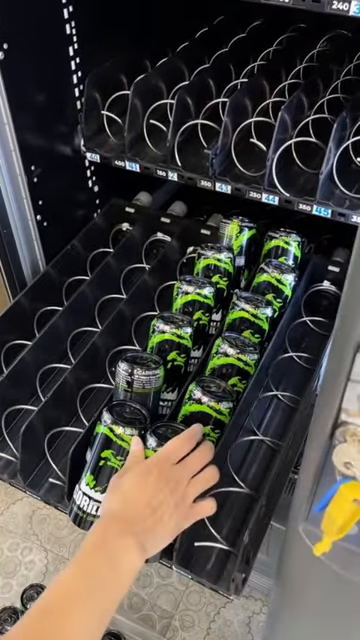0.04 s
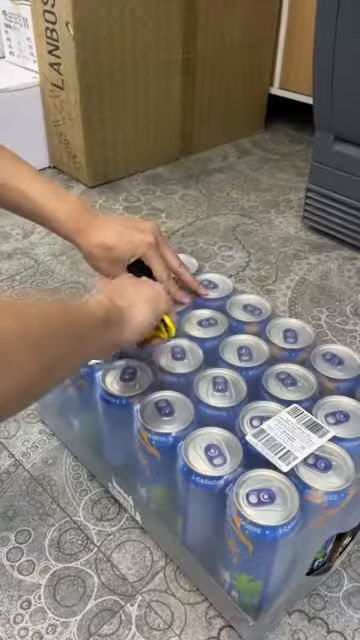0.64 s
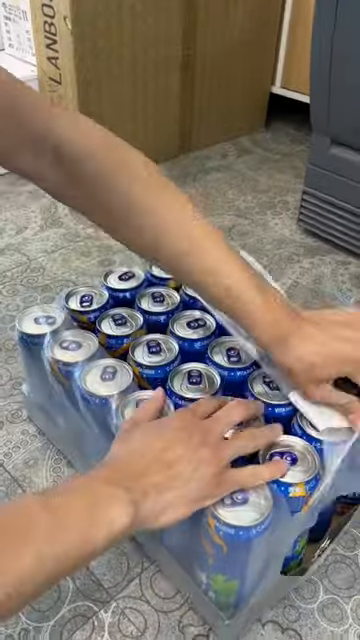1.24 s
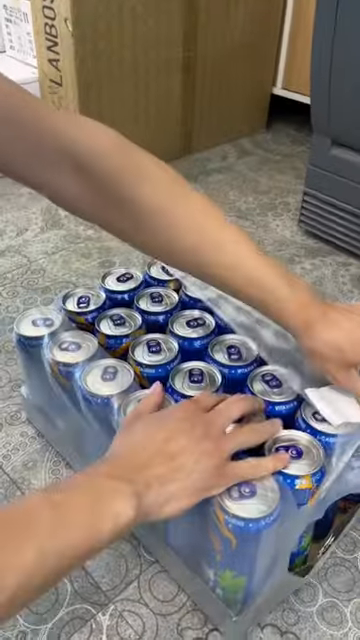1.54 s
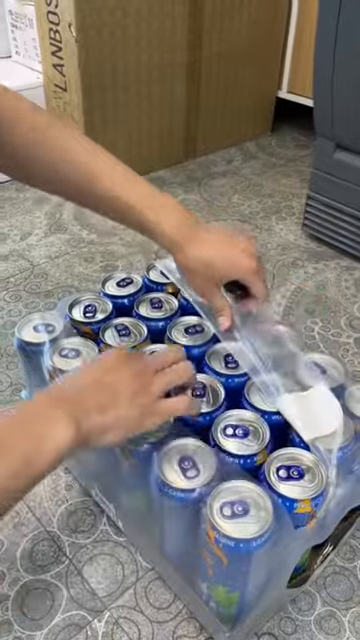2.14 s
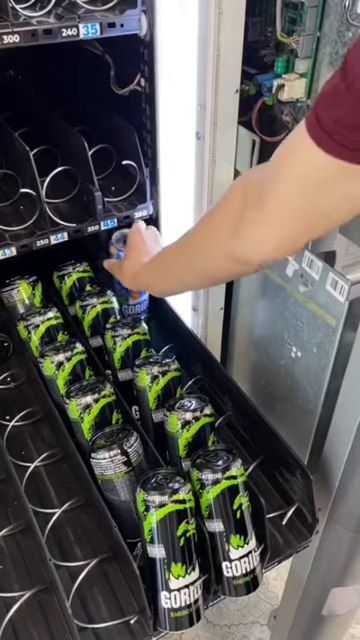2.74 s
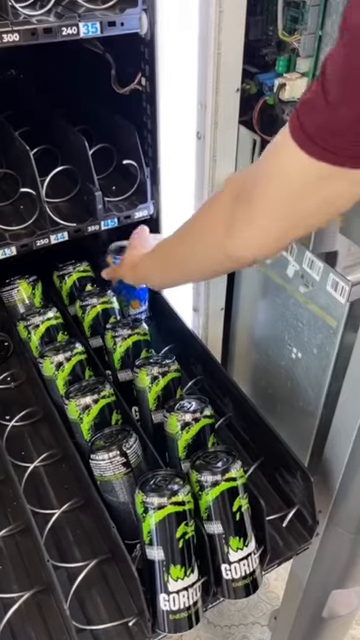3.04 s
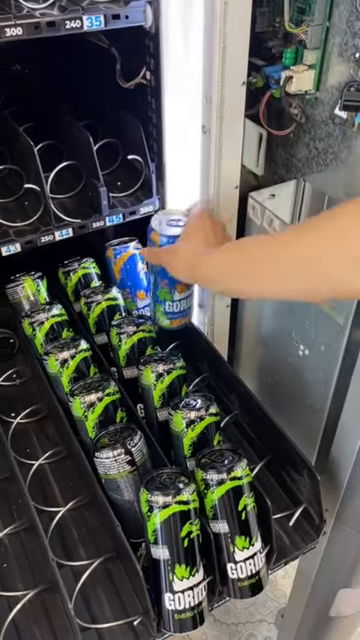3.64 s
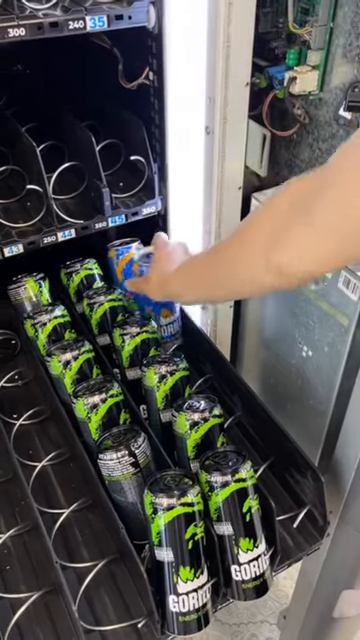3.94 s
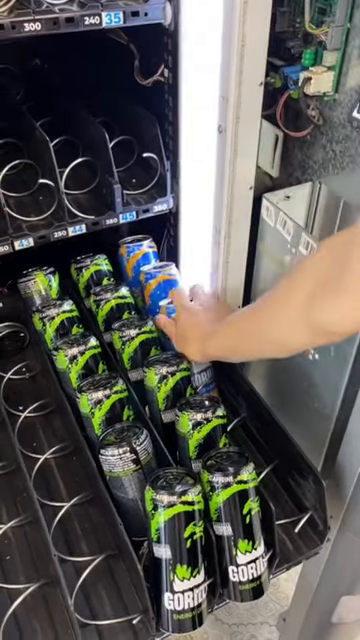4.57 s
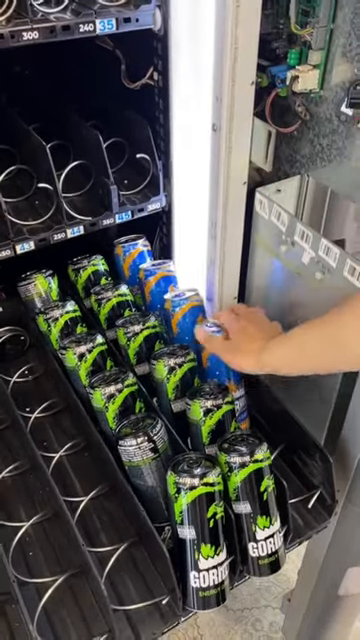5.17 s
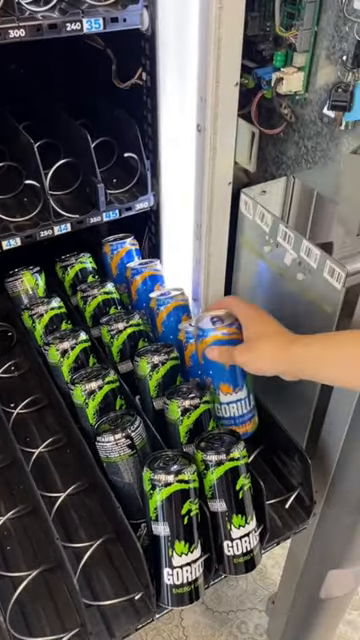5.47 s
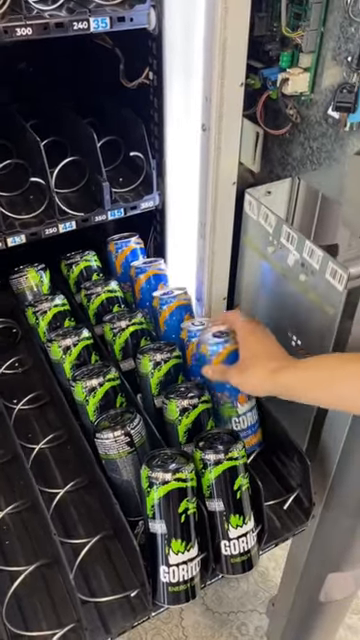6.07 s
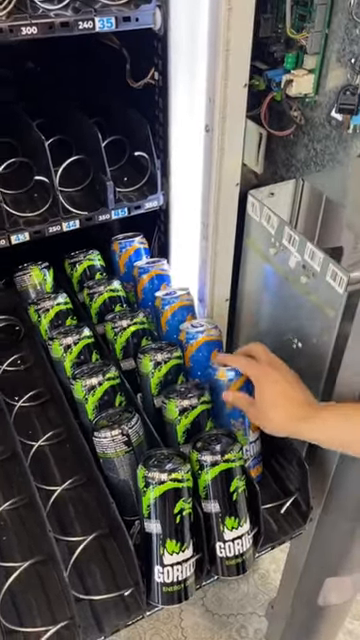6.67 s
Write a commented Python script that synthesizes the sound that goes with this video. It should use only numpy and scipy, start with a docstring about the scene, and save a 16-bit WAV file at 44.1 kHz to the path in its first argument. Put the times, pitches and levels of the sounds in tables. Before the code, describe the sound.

Plastic film snaps and tears off a pack, followed by full cans clunking and scraping into a vending machine's steel tray.

```python
"""Unwrapping and loading drink cans

Close to the microphone, a knife slits the shrink wrap on a pack of cans, tapping their lids, and the
film crinkles and snaps as it is torn back. Full cans are then set one by one into the sheet-metal tray
of a vending machine. Impact and friction excite the modes of cans, tray and wire spiral as they knock,
rock and slide. Soft bumps thud on the microphone, and the loudest blows overload it."""
import sys
import numpy as np
from scipy import signal
from scipy.fft import rfft, irfft, next_fast_len
from scipy.io import wavfile
from scipy.ndimage import uniform_filter1d

SR = 44100
rng = np.random.default_rng(int(sys.argv[2]) if len(sys.argv) > 2 else 0)


def digitize_waveform(pressure):
    """Quantize a signal to 16-bit integers and store it at the path in sys.argv[1].

    Rows of a 2-D input are taken as channels; values are limited to [-1, 1].
    """
    field = np.atleast_2d(pressure).T
    bounded = np.clip(field, -1, 1)
    quanta = np.round(bounded * 32767).astype(np.int16)
    wavfile.write(sys.argv[1], SR, quanta)


N = 300321
RING_SIZE, LEAD_SIZE = 22000, 400   # samples: one response, and the lead-in to a contact
TIME = np.arange(N) / SR
AGE = TIME[:RING_SIZE]


def from_db(db):
    """Amplitude ratio: 20 dB is a factor of ten."""
    return 10 ** (np.asarray(db) / 20)


def rms_one(x):
    """Normalisation to unit mean power."""
    return x / np.sqrt(np.mean(x ** 2) + 1e-20)


def dying(t60):
    """Exponential damping: 60 dB in t60 seconds."""
    return np.exp(-np.log(1000) * AGE / max(t60, 1e-3))


# moments at which ringing stops short: time_s
STOPS_S = [3.984, 5.15, 6.73]

def add(out, start_s, sound):
    """Superposition: mix in a sound, cut off at the next stop."""
    start = max(int(start_s * SR), 0)
    stop = min([start + len(sound), N] + [int(s * SR) for s in STOPS_S if s > start_s])
    out[start:stop] += sound[:stop - start]


def colour(x, spectrum):
    """Minimum-phase filtering: folding the cepstrum makes the given spectrum causal."""
    size = 2 * next_fast_len(len(x) // 2 + RING_SIZE)
    hz, db = np.transpose(spectrum)
    bins = np.maximum(np.arange(size // 2 + 1) * SR / size, 1)
    gain = from_db(np.interp(np.log(bins), np.log(hz), db))
    cepstrum = irfft(np.log(gain))
    cepstrum[1:size // 2] *= 2
    cepstrum[size // 2 + 1:] = 0
    return irfft(rfft(x, size) * np.exp(rfft(cepstrum)))[:len(x)]


def grains(per_s, spread_db, size=N):
    """Shot noise: tiny random contacts, most weak, a few strong."""
    strength = from_db(spread_db * np.minimum(rng.exponential(1, size), 4))
    return (rng.random(size) < per_s / SR) * strength * rng.choice([-1, 1], size)


def flicker(per_s, depth_db):
    """Random amplitude modulation: a wandering gain."""
    knots = rng.standard_normal(2048)
    return from_db(depth_db * np.interp(TIME * per_s, np.arange(len(knots)), knots))


def effort(moves, attack_s, t60):
    """Power summation of moves (start_s, length_s, level_db) that each rise, hold and decay."""
    power, age = np.zeros(N), TIME[:SR]
    attack = np.minimum(age / attack_s, 1)
    for start_s, length_s, db in moves:
        release_db = -60 * np.maximum(age - length_s, 0) / t60
        add(power, start_s, (attack * from_db(db + release_db)) ** 2)
    return np.sqrt(power)


def ringing(modes, detune):
    """Modal decay: where a body is hit and how it is held vary each mode's strength and pitch."""
    strengths = rng.choice([-1, 1], len(modes)) * from_db(2 * rng.standard_normal(len(modes)))
    shifts = 1 + detune * rng.standard_normal(len(modes))
    return sum(strength * from_db(db) * np.sin(2 * np.pi * hz * shift * AGE) * dying(t60)
               for strength, shift, (hz, db, t60) in zip(strengths, shifts, modes))


def cloud(dense_t60, room_db, room_t60, dull_hz):
    """Modal overlap: dense modes merge into decaying noise, with a duller room tail behind."""
    near, far = rng.standard_normal((2, RING_SIZE))
    far = signal.sosfilt(signal.butter(1, dull_hz, fs=SR, output="sos"), far)
    return near * dying(dense_t60) + from_db(room_db) * far * dying(room_t60)


def strike(blows, edges_hz, registers, body, note_db, note_q, chatter_db, rise_s, window_size):
    """Impact as convolution: a force that builds, hits and chatters drives a body's impulse response."""
    out = np.zeros(N)
    bands = [signal.butter(3, pair, "band", fs=SR, output="sos") for pair in zip(edges_hz, edges_hz[1:])]
    since = AGE - AGE[LEAD_SIZE]
    for start_s, length_s, level_db, pitch_hz, *character in blows:
        build_up = np.minimum(since, 0) / rise_s
        fall = (np.maximum(since, 0) / max(length_s, 1e-3)) ** 2
        chatter = grains(per_s=6000, spread_db=2.2, size=RING_SIZE) * np.exp(build_up - fall)
        force = from_db(chatter_db) * rms_one(chatter) / np.sqrt(RING_SIZE)
        force[LEAD_SIZE] += 1   # the main contact
        sound = signal.fftconvolve(force, body())[:RING_SIZE]
        sound += from_db(note_db) * signal.lfilter(*signal.iirpeak(pitch_hz, note_q, fs=SR), sound)
        band_levels_db = level_db + np.dot(registers, [1, *character])
        for band, db in zip(bands, band_levels_db):
            part = signal.sosfilt(band, sound)
            peak_rms = np.sqrt(uniform_filter1d(part ** 2, window_size).max())
            add(out, start_s + since[0] + rise_s, from_db(db) * part / peak_rms)
    return out


# spectrum of the quiet room: frequency_hz, gain_db
ROOM_SPECTRUM = [(25, 5), (100, -17), (230, -5), (450, -2.5), (600, -10.5), (780, -2), (1000, -9.5),
                 (1350, -15), (2000, -29), (8000, -35.5)]

def room_tone():
    """Stationary noise: a faint, low background."""
    return from_db(-59) * rms_one(colour(rng.standard_normal(N), ROOM_SPECTRUM))


# spectrum of the microphone's rumble: frequency_hz, gain_db
RUMBLE_SPECTRUM = [(15, -8.5), (30, 1), (60, -13), (120, -6.5), (200, -19.5), (400, -38)]
# soft bumps on the microphone: start_s, peak_db, pitch_hz, swell_s
BUMPS = [(0.005, -29.5, 58.5, .02), (0.56, 1, 47.35, 0.014), (0.606, -11, 52, .012),
         (0.701, -11.5, 56, 0.013), (0.897, -22, 60, 0.01), (0.956, -15.5, 65, 0.0052),
         (1.167, -5, 50, 0.0093), (1.203, -2, 110, 0.0054), (1.29, 1, 55, 0.0057), (1.363, -5.5, 50, 0.016),
         (1.404, -0.5, 46, 0.0061), (1.521, -9, 72, 0.0082), (1.611, -11, 87.7, 0.003),
         (1.674, -12.5, 49.8, 0.014)]

def handling():
    """Handling noise: bumps swing the air briefly; they and heavy knocks swell a faint, steady rumble."""
    jolts = [(s, swell_s, db - 23) for s, db, _, swell_s in BUMPS]
    jolts += [(s, length_s, db + weight_db - 39.5) for s, length_s, db, _, weight_db, _ in KNOCKS]
    rumble_gain = from_db(-63) + effort(jolts, attack_s=0.015, t60=0.9)
    out = rumble_gain * rms_one(colour(rng.standard_normal(N), RUMBLE_SPECTRUM))
    for start_s, db, hz, swell_s in BUMPS:
        age = AGE / swell_s
        swell = from_db(db) * age ** 2 * np.exp(2 - 2 * age)
        add(out, start_s, swell * np.sin(2 * np.pi * (hz * AGE + rng.random())))
    return out


# modes of the stretched film: frequency_hz, level_db, t60_s
FILM_MODES = [(353, -16, 0.06), (1096, -18, 0.05), (2250, -16, 0.048), (3590, -6, .03)]

def film_response():
    """Heavy damping: taut film gives a crack and hardly rings."""
    crack = cloud(dense_t60=0.0097, room_db=-17.5, room_t60=0.098, dull_hz=9050)
    return crack + from_db(-30.5) * ringing(FILM_MODES, detune=0.057)


# spectra of film crinkling, rubbing and flapping: frequency_hz, gain_db
CRINKLE_SPECTRUM = [(1800, -26), (2800, -1), (4000, -0.5), (5300, 4.5), (6600, 3), (8200, -0.5),
                    (9500, 0.5), (11000, -20)]
RUB_SPECTRUM = [(450, -32.5), (800, 7.5), (1100, 3.5), (1400, 4), (1900, 5.5), (2800, 5), (4000, -28)]
FLAP_SPECTRUM = [(80, -15.5), (180, -1), (330, -1.5), (480, -2.5), (700, -13.5), (1500, -42)]
# pulls on the film: start_s, length_s, level_db, slackness_db
PULLS = [(0.12, 0.045, -45, -10), (0.247, 0.12, -26, -2), (0.47, 0.11, -28.5, -15),
         (0.61, 0.46, -35.5, -9.5), (0.91, 0.079, -36, -1.5), (1.024, 0.11, -41, -2.5),
         (1.13, 0.21, -30, -1.5), (1.496, 0.069, -27.5, -0.5), (1.572, 0.1, -13.5, -11.5),
         (1.691, 0.18, -22.5, -15), (1.874, 0.18, -24.5, 3.5), (2.115, 0.17, -52.5, 20.5),
         (2.266, 0.04, -27.5, -7.5), (2.424, .115, -38, -9)]

def film_pulls():
    """Buckling: creases flip as the film is pulled; taut film crinkles, slack film also rubs and flaps."""
    def pull(slack_share):
        moves = [(s, length_s, db + slack_share * slack_db) for s, length_s, db, slack_db in PULLS]
        return effort(moves, attack_s=0.016, t60=0.18)

    fine = rms_one(grains(per_s=4200, spread_db=3.9) * flicker(per_s=110, depth_db=1.6))
    hiss = 1.1 * rng.standard_normal(N)   # crinkle smeared by the room
    folds = rms_one(signal.fftconvolve(grains(per_s=130, spread_db=2.8), film_response())[:N])
    creases = (fine + hiss + from_db(1) * folds) * flicker(per_s=45, depth_db=1.5)
    flutter = grains(per_s=1500, spread_db=2.7)
    crinkle = from_db(-0.5) * pull(slack_share=0) * rms_one(colour(creases, CRINKLE_SPECTRUM))
    rub = from_db(-4) * pull(slack_share=0.4) * rms_one(colour(creases, RUB_SPECTRUM))
    flap = from_db(1) * pull(slack_share=1) * rms_one(colour(flutter, FLAP_SPECTRUM))
    return crinkle + rub + flap


# limits of the film's bands (body, middle, crack, fizz): edge_hz
FILM_EDGES_HZ = [120, 800, 2500, 6000, 11000]
# the same bands, where brightness trades body for fizz: offset_db, brightness_share
FILM_REGISTERS = [(-2.5, -1.1), (-3.5, -0.43), (0.5, .4), (-1.5, 0.72)]
# film splitting and snapping: start_s, length_s, level_db, pitch_hz, brightness_db
SNAPS = [(0.259, 0.0076, -8.5, 680, -1), (0.311, 0.044, -21.5, 600, 1.5), (0.366, .003, -14.5, 5750, 4.5),
         (0.419, 0.012, -11, 7600, 7), (0.4695, 0.0039, -17, 3700, 12), (0.486, 0.0062, -9.5, 3500, 7),
         (1.142, 0.0022, -23.5, 2900, 5.5), (1.159, 0.0021, -21.5, 2900, 15.5),
         (1.167, 0.008, -13, 2850, 2.5), (1.19, 0.0067, -11.5, 3000, 4), (1.256, .002, -24.5, 3020, 0),
         (1.298, 0.004, -22.5, 600, -11), (1.365, 0.0015, -28, 3000, -6.5), (1.384, .006, -17.5, 930, -7),
         (1.408, 0.0023, -22.5, 3000, -4.5), (1.4755, 0.0031, -18, 2400, -2),
         (1.563, 0.0027, -18, 1800, -2), (1.603, .003, -13, 4850, 1), (1.684, 0.0071, -16.5, 3750, 2.5),
         (1.844, 0.0061, -11, 2750, 4), (1.865, 0.0013, -13.5, 2750, 1), (1.887, 0.0024, -19, 2250, 4.5),
         (1.914, 0.0013, -13.5, 8300, -3), (1.984, 0.0039, -17, 600, 0.5), (2.031, 0.0028, -22, 7800, 17),
         (2.047, 0.0039, -22.5, 330, -9), (2.07, .002, -12.5, 2160, -5.5), (2.083, 0.0032, -19, 313, -4),
         (2.117, 0.0045, -17.5, 5700, 1), (2.262, 0.02, -27.5, 350, -7.5), (2.354, 0.0009, -34, 2050, -7.5),
         (2.431, 0.001, -31.5, 1800, 3.5), (2.49, 0.0044, -28, 1000, -7)]

def film_snaps():
    """Sudden release of tension: each split sends an impulse through the film."""
    return from_db(1) * strike(SNAPS, FILM_EDGES_HZ, FILM_REGISTERS, film_response,
                               note_db=2.1, note_q=7, chatter_db=1, rise_s=0.0016, window_size=220)


# modes of a can lid: frequency_hz, level_db, t60_s
LID_MODES = [(1017, -1, 0.1), (1650, -10, 0.17), (1852, -7, 0.091), (1879, -4, .07), (2420, -12, .12),
             (2654, -20.5, .13), (2920, -16, 0.057)]
# the blade tapping lids through the film: start_s, length_s, level_db, pitch_hz, brightness_db
KNIFE_TAPS = [(0.585, .0024, -17.5, 3900, 1), (0.632, 0.0022, -23.5, 2600, 3),
              (0.773, 0.0061, -17, 1060, 3), (0.791, 0.0043, -17.5, 5000, 13.5),
              (0.878, 0.00094, -13.5, 4080, 9.5), (0.894, .008, -11, 1890, 8.5),
              (0.916, .006, -24.5, 5600, 14.5), (0.99, .006, -10, 1960, 4.5)]

def knife():
    """Impulse excitation: each tap of the blade cracks the film and leaves a lid ringing."""
    out = strike(KNIFE_TAPS, FILM_EDGES_HZ, FILM_REGISTERS, film_response,
                 note_db=2.1, note_q=7, chatter_db=15, rise_s=0.0012, window_size=220)
    for start_s, _, db, *_ in KNIFE_TAPS:
        add(out, start_s, from_db(db - 2.5) * ringing(LID_MODES, detune=0.0024))
    return out


# modes of the wire spiral: frequency_hz, level_db, t60_s
SPIRAL_MODES = [(727, -4, 2.6), (833, 1.5, 0.8), (1385, -10.5, 0.57)]

def spiral():
    """Light damping: the wire spiral sings on faintly after every knock."""
    out = np.zeros(N)
    for start_s, _, db, *_ in KNOCKS:
        add(out, start_s, from_db(db - 33.5) * ringing(SPIRAL_MODES, detune=0.012))
    return out


# modes of the loaded tray: frequency_hz, level_db, t60_s
TRAY_MODES = [(78.2, -7, 0.29), (109, -17.5, 0.28), (148.8, -7, 0.21), (169.2, -4.5, 0.26),
              (310, -18.5, 0.084), (358.3, -3.5, 0.1), (443.2, 4, 0.18), (462, 2.5, 0.19),
              (519.7, 5.5, 0.067), (602.7, -3.5, 0.12), (676.7, 2, 0.069), (702.4, -0.5, 0.22),
              (756, -18.5, 0.11), (760, -20, 0.035), (962, -3, 0.15), (1092, -9, 0.27), (1093, -15.5, 0.39),
              (1452, -18.5, 0.36), (1830, 0.5, 0.17), (1944, -8.5, 0.18)]
# spectral envelope of the tray's response: frequency_hz, gain_db
TRAY_SPECTRUM = [(160, 2), (225, -6), (300, 5), (700, -3), (800, -1.5), (1050, -3), (1450, 0), (3300, -1.5),
                 (3850, -6), (4600, -1.5), (6200, 3), (6650, -1), (9000, -3)]

def tray_response():
    """Impulse response: full cans and the steel tray ring together inside the cabinet."""
    dense = cloud(dense_t60=0.096, room_db=-17.5, room_t60=0.41, dull_hz=3000)
    return colour(dense + from_db(-23.5) * ringing(TRAY_MODES, detune=0.0091), TRAY_SPECTRUM)


# spectra of the tray's drone and the cans' scratch: frequency_hz, gain_db
DRONE_SPECTRUM = [(130, -10.5), (345, -1.5), (470, -9.5), (720, -0.5), (1000, -8.5), (1600, -21.5),
                  (3000, -61)]
SCRATCH_SPECTRUM = [(700, -22), (1200, 5.5), (2000, 3), (3200, 1.5), (4200, -1.5), (5600, 1), (7000, -2),
                    (8500, -3.5), (11000, 2)]
# cans dragged along the tray: start_s, length_s, level_db, scratchiness_db
DRAGS = [(2.61, 0.13, -34.5, -1.5), (2.744, 0.088, -41.5, 14.5), (2.9, 0.16, -35.5, -7),
         (3.826, 0.2, -31, -8.5), (3.984, 0.047, -27, -9), (4.288, 0.13, -24, -11), (4.6, 0.34, -27, -2.5),
         (5.003, 0.24, -35.5, -10.5), (5.337, 0.13, -46.5, 8.5), (5.56, 0.18, -49.5, 1.5),
         (6.389, 0.1, -37.5, -7.5)]

def can_slides():
    """Friction excitation: cans scratch and keep the tray droning as they slide or shiver after a knock."""
    attack_s = 0.013
    drag = effort([(s, length, db) for s, length, db, _ in DRAGS], attack_s, t60=0.38)
    scrape = effort([(s, length, db + rough) for s, length, db, rough in DRAGS], attack_s, t60=0.38)
    shiver = effort([(s, length, db) for s, length, db, *_ in KNOCKS], attack_s, t60=1)
    jingle = effort([(s, length, db + hard) for s, length, db, *_, hard in KNOCKS], attack_s, t60=0.25)
    drone_gain = from_db(-2.5) * np.hypot(drag, from_db(-29.5) * shiver)
    scratch_gain = from_db(-1) * np.hypot(scrape, from_db(-32.5) * jingle)

    roughness = grains(per_s=3500, spread_db=1.1) * flicker(per_s=60, depth_db=6.7)
    catches = grains(per_s=68, spread_db=0.59)   # rims catch on the wire spiral
    clink = cloud(dense_t60=0.094, room_db=-16.5, room_t60=0.2, dull_hz=3000)
    rattle = signal.fftconvolve(catches, clink)[:N]
    friction = rms_one(roughness) + from_db(-4) * rms_one(rattle)
    cabinet = from_db(11) * cloud(dense_t60=0.043, room_db=-21.5, room_t60=0.3, dull_hz=2970)
    humming = signal.fftconvolve(friction, cabinet + ringing(TRAY_MODES, detune=0.0019))[:N]
    drone = drone_gain * rms_one(colour(humming, DRONE_SPECTRUM))
    return drone + scratch_gain * rms_one(colour(friction, SCRATCH_SPECTRUM))


# limits of a knock's bands (thud, tray, can, clank, tick): edge_hz
KNOCK_EDGES_HZ = [50, 250, 560, 1100, 3500, 11000]
# balance of the same bands: offset_db, weight_share, hardness_share
KNOCK_REGISTERS = [(-18, 1.0, 0.046), (-3.5, 0.44, 0.064), (0.5, 0.084, 0.13), (-11.5, 0.065, 0.69),
                   (-13.5, 0.0079, 0.96)]
# cans striking spots on the tray: start_s, chatter_s, level_db, pitch_hz, weight_db, hardness_db
KNOCKS = [(2.548, 0.013, -22.5, 990, -10.5, 16.5), (2.573, .004, -10, 455, -3, 12),
          (2.581, 0.0049, -8, 333, 4.5, -1.5), (2.754, 0.036, -26.5, 334, 5.5, 9),
          (2.917, 0.012, -10.5, 740, -12, -2), (2.958, 0.021, -15.5, 445, -3, -9.5),
          (3.05, .02, -17.5, 715, 2, -20.5), (3.342, 0.0076, -48.5, 700, -17, -20),
          (3.487, 0.026, -37, 602, 4, -22.5), (3.563, 0.026, -38.5, 307, 27, -4),
          (3.658, 0.0071, -15.5, 645, -13, 3.5), (3.799, 0.031, -20, 507, -4, -6),
          (3.853, 0.021, -17, 690, -5, -8), (3.923, 0.024, -22.5, 1210, 0, 7.5),
          (3.954, 0.0075, -12.5, 508, 6.5, 12), (3.977, 0.016, -5, 506, 0, -23),
          (4.13, 0.0089, -22.5, 650, -7.5, -6.5), (4.187, 0.011, -8.5, 690, -22, 6.5),
          (4.209, 0.003, -22.5, 700, 5, -15), (4.278, 0.0033, -7, 468, -7.5, 5),
          (4.325, 0.13, -29, 690, 15, 8.5), (4.394, 0.0068, -4.5, 330, 13, 2),
          (4.416, 0.013, -18.5, 530, 18, 11.5), (4.54, 0.0046, -17.5, 580, -10.5, -6.5),
          (4.574, 0.0051, -5, 726, -3, 1.5), (4.712, 0.0057, -5.5, 456, -1.5, 4),
          (4.782, 0.0084, -29.5, 700, -13.5, -3), (4.874, .006, -3, 557, 9.5, 2.5),
          (4.895, .009, -11.5, 480, 4, 6), (5.246, 0.02, -9, 760, 8, -4), (5.303, .006, -17, 466, 8.5, 7),
          (5.377, 0.0045, -13, 640, -15, -5.5), (5.501, 0.0047, -16.5, 630, -8, 6),
          (5.541, 0.0035, -38.5, 604, 6, 22), (5.671, 0.0092, -24.5, 597, -10.5, -11.5),
          (5.775, 0.0081, -38.5, 600, -8, -17), (5.92, 0.038, -30, 574, -9.5, -8),
          (6.073, 0.052, -10.5, 642, -17, -6.5), (6.096, 0.0045, -3, 589, -3, 7),
          (6.114, .018, -12.5, 600, 5, 1.5), (6.336, 0.0045, -14, 616, -30, -18),
          (6.352, 0.015, -20, 447, -10, -0.5), (6.466, 0.0088, -25.5, 687, 0, -5),
          (6.706, 0.0078, -34, 694, -9, -15)]

def can_knocks():
    """Impact: a square landing (weight) feeds the lows, bare metal contact (hardness) the highs."""
    return from_db(0.54) * strike(KNOCKS, KNOCK_EDGES_HZ, KNOCK_REGISTERS, tray_response,
                                  note_db=5.6, note_q=7.5, chatter_db=9, rise_s=0.0014, window_size=530)


def scene():
    """Superposition in mono: unwrapping, then loading, in a quiet room."""
    room = room_tone()
    unwrapping = film_pulls() + knife() + film_snaps()
    loading = can_slides() + spiral() + can_knocks()
    return (room + handling() + unwrapping + loading)[None]


# frequency response of the microphone: frequency_hz, gain_db
MICROPHONE = [(20, 5), (900, -3), (1350, 1), (1900, 2.5), (3200, 1), (5200, 0.5), (6700, -4), (8200, -1.5),
              (9200, -6), (10000, -18)]

def record(dry):
    """Overload: the microphone clips, its band ends steeply, and the filter's overshoots clip again."""
    band_hz, cutoff_hz = 10072, 16000
    overloaded = np.clip(colour(dry[0], MICROPHONE), -1.05, 1.05)
    narrow = signal.sosfilt(signal.ellip(10, 0.1, 80, band_hz, fs=SR, output="sos"), overloaded)
    clipped = np.clip(narrow, -1, 1)
    return signal.sosfilt(signal.ellip(10, 0.1, 70, cutoff_hz, fs=SR, output="sos"), clipped)[None]


dry = scene()
out = record(dry)
digitize_waveform(out)
```